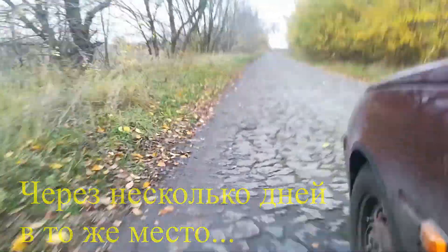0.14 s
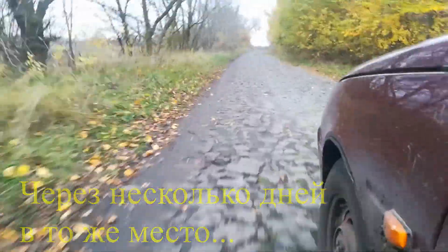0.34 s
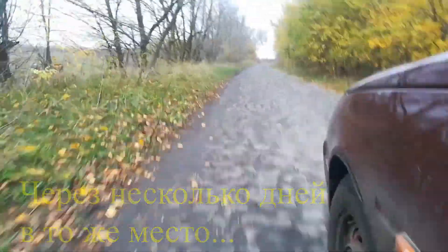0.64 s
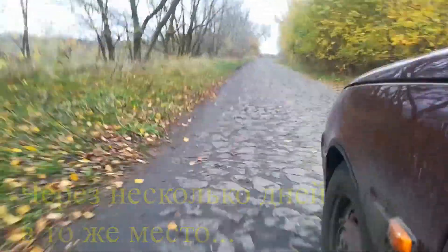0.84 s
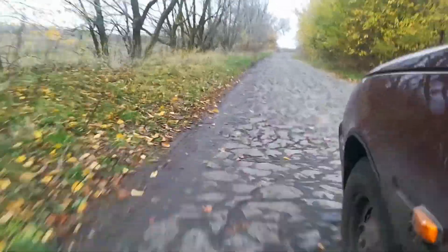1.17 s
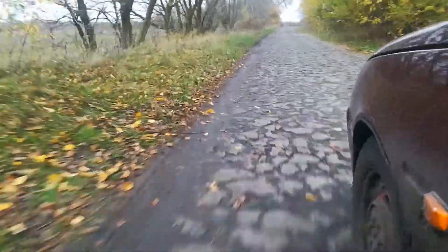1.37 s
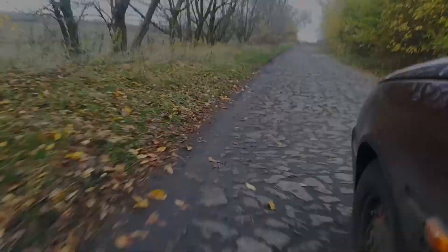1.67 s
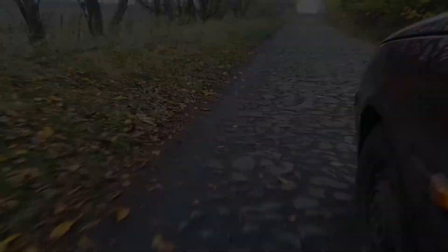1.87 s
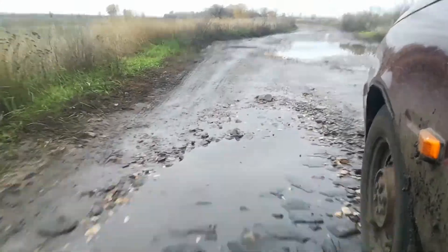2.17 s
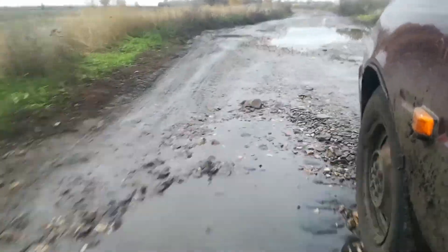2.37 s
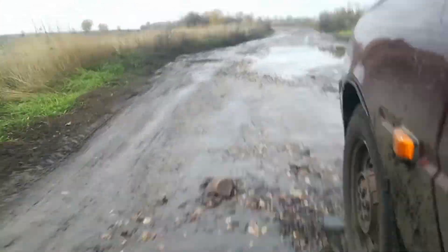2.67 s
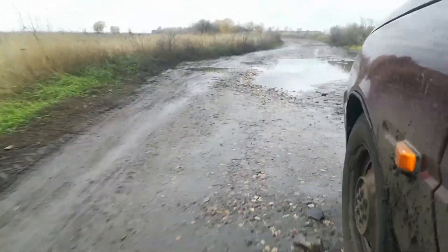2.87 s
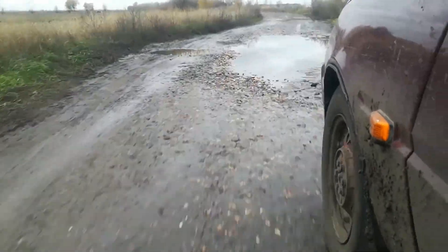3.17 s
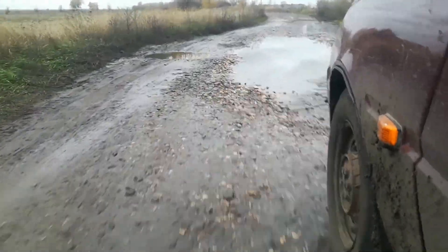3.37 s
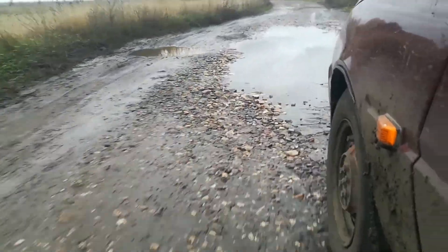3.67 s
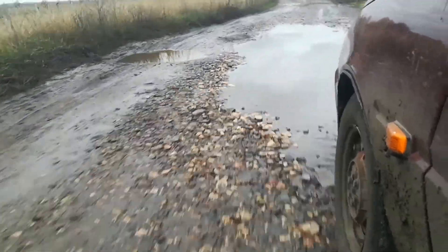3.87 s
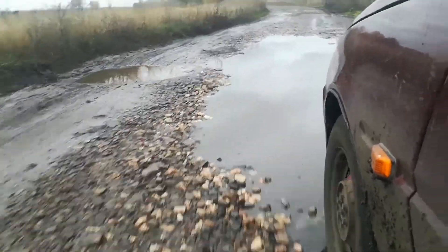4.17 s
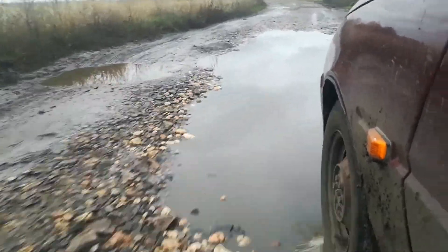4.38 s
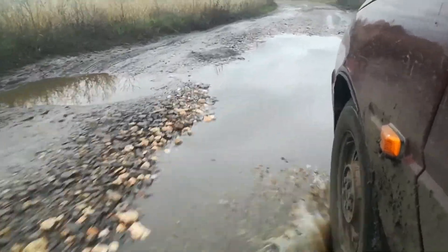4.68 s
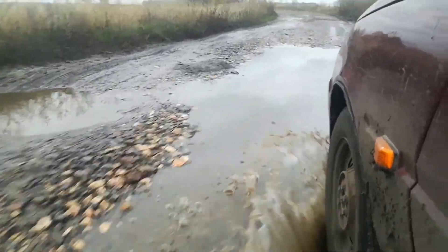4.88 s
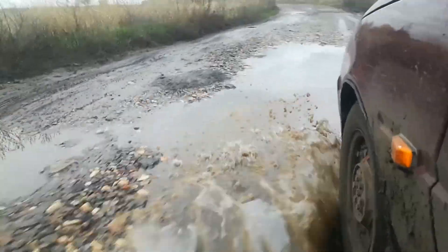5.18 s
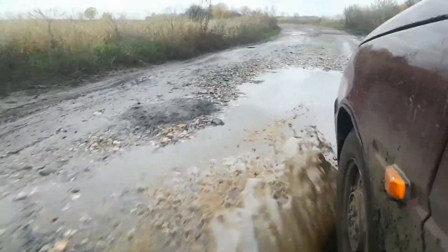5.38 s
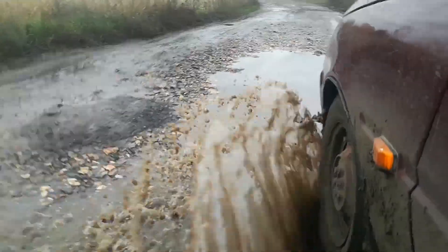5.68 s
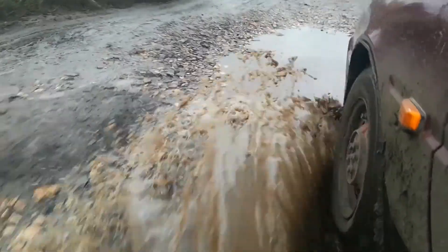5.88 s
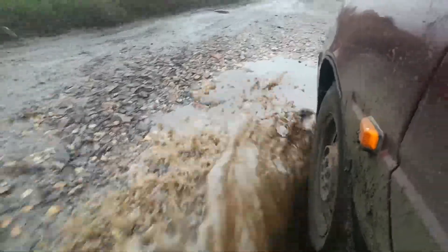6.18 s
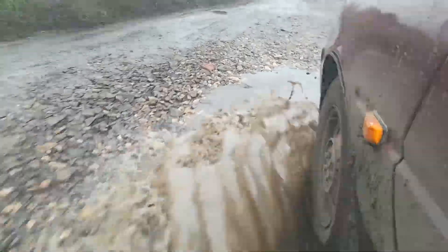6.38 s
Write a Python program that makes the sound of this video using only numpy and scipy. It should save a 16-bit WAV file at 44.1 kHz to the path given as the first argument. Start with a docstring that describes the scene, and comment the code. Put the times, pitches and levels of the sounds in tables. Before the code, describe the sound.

Close to the front wheel of a moving car, the tyre booms and patters over cobbles, with sharp stone knocks, a steady engine drone and gusts on the microphone. The surface changes to wet dirt: the engine clatters and slows a little as grit hisses and pebbles pop from the tread. Finally the wheel ploughs through a long puddle, throwing rushing, bubbling water against the body, and a surge slaps the wheel arch.

```python
"""A four-cylinder engine drones while a tyre rumbles and knocks over cobbles, heard through a microphone held
out of the car window behind the front wheel. Wind buffets the microphone, and metal squeaks once. At 2 s the
scene changes to a wet dirt road, where grit crackles and pebbles snap from under the tyre. Then the car drives
into a long muddy puddle: water gurgles, sprays and slops in the wheel arch, and a last surge ends in one hard
slap."""
import sys
import numpy as np
from scipy import signal
from scipy.io import wavfile
from scipy.ndimage import uniform_filter1d, minimum_filter1d

SR = 44100
rng = np.random.default_rng(int(sys.argv[2]) if len(sys.argv) > 2 else 0)


def log_audio(samples):
    """Write samples as a 16-bit WAV file to the path given in sys.argv[1]."""
    # one column per channel
    frames = np.atleast_2d(samples).T
    # limit to full scale, then quantise
    limited = np.clip(frames, -1, 1)
    pcm = np.round(limited * 32767).astype(np.int16)
    wavfile.write(sys.argv[1], SR, pcm)


N = 287973

# Table levels are starting values; the functions add their own gains.
# engine speed after the lane, slowing and then pulling into the puddle: t/s, crank turns per second
CRANK_SPEED = [(2.15, 44.8), (2.55, 41.0), (3.02, 33.8), (3.54, 33.8), (4.5, 38.3), (4.81, 38.3),
               (5.39, 33.5), (6.36, 33.4), (6.53, 36.0)]
# the tones of the engine: cycles per crank turn, level/dB
ENGINE_TONES = [(2, -24.5), (3, -27), (3.5, -32.5), (4, -31.5), (5, -31), (6, -37)]
# how hard the engine works: t/s, level/dB
ENGINE_LOAD = [(0, 0), (2.05, -1.5), (2.22, 1), (2.75, -1.5), (4.2, -.3), (4.55, 1.5), (5.0, -.8),
               (5.35, -.3), (5.7, -2.5)]
# the exhaust booms at two pitches and muffles what lies above: f/Hz, level/dB
EXHAUST_RESPONSE = [(66, -2), (76, 5), (87, 3), (100, -0.5), (122, 0), (134, 1.5), (146, -14), (240, -18.5)]
# how much the road shakes the car body: t/s, level/dB
BODY_SHAKE = [(0.0, -23.5), (0.16, -18), (1.71, -20.5), (1.93, -15.5), (2.18, -23.5), (2.5, -29.5),
              (4.07, -38), (4.25, -29), (4.8, -29), (6.53, -27.5)]
# the wheel drops into hollows between the cobbles: t/s, level/dB
HOLLOWS = [(1.17, -24), (1.31, -18.5), (1.8, -24), (1.961, -31)]
# the loudest stones knock in the wheel arch: t/s, level/dB, f/Hz
STONE_KNOCKS = [(0.053, -17.5, 1250), (0.304, -19, 1130), (0.456, -22.5, 1210), (0.513, -20, 1170),
                (0.656, -19.5, 1250), (1.104, -24, 990), (1.233, -26, 1040), (1.372, -20.5, 1110),
                (1.426, -25, 1130), (1.581, -19, 1080), (1.612, -17, 1090), (1.704, -18, 1040),
                (1.782, -18, 1170), (1.808, -22.5, 1190), (1.932, -19.5, 1200), (2.262, -26, 1050),
                (2.563, -25, 1130), (2.948, -21.5, 1070), (3.07, -27.5, 1290), (3.2, -26.5, 1240),
                (3.873, -22, 1420), (4.019, -26, 1100)]
# gusts on the microphone: t/s, length/s, level/dB
WIND_GUSTS = [(2.063, 0.063, -32), (2.653, 0.03, -31.5), (2.724, 0.03, -23.5), (3.0, .08, -34),
              (3.11, .08, -28.5), (3.285, 0.04, -26), (4.009, .12, -34.5), (4.92, 0.054, -35),
              (5.228, 0.078, -34.5), (5.464, 0.035, -33.5), (6.377, .12, -26)]
# the pitches of a thin metal squeak: f/Hz, level/dB
SQUEAK_TONES = [(3610, -54), (4270, -48)]
# pebbles snap from under the tread: t/s, level/dB, f/Hz
PEBBLE_SNAPS = [(1.2463, -33, 2960), (1.7823, -28, 2670), (1.858, -33.5, 3160), (1.922, -24.5, 3500),
                (2.0068, -31, 3060), (2.9477, -28, 2970), (3.8643, -31, 2800), (3.9135, -28, 3270),
                (4.0228, -26.5, 3220), (4.0703, -31, 2960), (4.2168, -25.5, 4160), (4.4345, -28, 3800),
                (4.5126, -24.5, 3600)]
# the tyre crunches through gravel: t/s, length/s, level/dB
GRAVEL_PATCHES = [(3.837, 0.052, -43.5), (3.99, 0.065, -43.5)]
# water under the wheel: t/s, depth (1 is about full)
WATER_DEPTH = [(4.24, 0.16), (4.55, 0.42), (4.85, 0.76), (5.1, 1.12), (5.6, 0.98), (6.53, 0.98)]
# thrown water splats on the panel over the wheel: t/s, level/dB, f/Hz
WATER_SPLATS = [(4.4902, -14.5, 2090), (4.604, -19, 1950), (4.6422, -17, 1700), (4.7098, -19, 2140),
                (4.7436, -14, 1930), (4.803, -16, 1900), (4.8678, -10.5, 2300), (4.9072, -18.5, 2010),
                (5.1947, -17.5, 2100)]
# lumps of water slop against the body: t/s, level/dB, f/Hz, cycles of ringing
WATER_SLOPS = [(4.642, -19, 934, 13), (4.684, -22, 1000, 16), (4.708, -17.5, 1020, 12),
               (4.722, -20.5, 960, 13), (4.7445, -8.5, 1270, 11), (4.813, -18, 1010, 13),
               (4.998, -19, 1000, 11), (5.153, -19.5, 1150, 12), (5.197, -17, 1210, 12),
               (5.299, -13.5, 920, 11), (5.391, -20, 1060, 8.5), (5.482, -17.5, 345, 8.9),
               (5.895, -9.5, 800, 17)]
# the pitches at which the wheel arch rings: f/Hz, level/dB
ARCH_TONES = [(440, -6.5), (710, -3), (850, 2.5), (1130, -0.5)]

# A spectrum says how strong a sound is from low to high pitch. Each one lists: f/Hz, level/dB
RUMBLE_SPECTRUM = [(18, -12), (34, -0.5), (50, -3.5), (66, 2), (125, -6.5), (170, -12), (300, -19),
                   (600, -33)]  # booming tyre and body
COBBLE_SPECTRUM = [(300, 6.5), (600, 0), (1150, 2.5), (1600, -8), (4300, -30), (7000, -32), (10500, -44),
                   (15500, -53.5)]  # tread on stone
WIND_SPECTRUM = [(30, -12.5), (100, 0), (220, 4.5), (350, -5), (500, -15), (750, -39), (1500, -58)]  # air on the microphone
CLATTER_SPECTRUM = [(300, -10), (700, -0.5), (1200, 10.5), (1550, -5), (1950, -11), (6000, -39)]  # engine clatter
GRIT_SPECTRUM = [(1500, 3.5), (3000, -3), (4900, -5), (6900, -10.5), (10500, -22.5), (15500, -34)]  # tread on wet grit
GURGLE_SPECTRUM = [(700, -3), (900, -4), (1300, 3)]  # the wave ahead of the tyre
WASH_SPECTRUM = [(300, 1), (580, -4.5), (850, 2.5), (1200, 4.5), (1500, -3), (1900, 2), (3800, -4.5),
                 (9000, -23)]  # rushing water
SPRAY_SPECTRUM = [(2500, -4), (4800, -7), (8000, -13), (10500, -21.5), (15500, -24.5)]  # fine drops

# how alike the microphone's two sides sound: f/Hz, likeness (1 or more counts as fully alike)
STEREO_LIKENESS = [(55, 0.995), (130, 1.3), (250, 1.3), (550, 0.23), (1100, 1), (1900, 1), (5000, 0.17)]
# how much louder the left side is than the right: f/Hz, level/dB
LEFT_OVER_RIGHT = [(150, -1), (600, 2), (1300, 3.5), (2400, 5.5), (4400, 8.5), (8100, 4), (15000, -0.5)]

LANE_END_S, LANE_FADE_S, LANE_TURNS_PER_S = 2.0, 0.1567, 34
CUTOFF_HZ = 15750
TIME_S = np.arange(N) / SR


def from_db(db):
    """Turn decibels into a number to multiply by."""
    return 10 ** (np.asarray(db) / 20)


def rms_one(x):
    """Scale a signal to an average power of 1."""
    return x / np.sqrt(np.mean(x ** 2) + 1e-20)


def pan(db):
    """Left and right gains that make the left louder by db."""
    return from_db(db * np.array([[.5], [-.5]]))


def in_time(points):
    """Read a time table at every sample."""
    return np.interp(TIME_S, *np.transpose(points))


def at_hz(points, hz):
    """Read a frequency table at one pitch, with octaves evenly spaced."""
    pitches, values = np.transpose(points)
    return np.interp(np.log(hz), np.log(pitches), values)


def swell(start_s, length_s, attack_s, release_s):
    """Rise to 1 at start_s, hold, then fade; the attack and release times each cover 20 dB."""
    t = TIME_S - start_s
    return 10 ** -np.clip(np.maximum(-t / attack_s, (t - length_s) / release_s), 0, 10)


def drift(rate_hz):
    """A smooth random wobble of typical size 1."""
    step = 40  # samples between random values
    r = np.exp(-2 * np.pi * step * rate_hz / SR)
    slow = signal.lfilter([1], [1, -2 * r, r * r], rng.standard_normal(N // step + 2002))[2000:]
    return np.interp(np.arange(N) / step, np.arange(len(slow)), rms_one(slow))


def ring(clicks, hz, cycles):
    """Each click is softened and rings a tone that fades by 60 dB in that many cycles."""
    decay = np.exp(-np.log(1000) * hz / (cycles * SR))
    soften = signal.butter(2, [hz / 2, min(hz * 2, CUTOFF_HZ)], "band", fs=SR, output="sos")
    resonator = [1, 0, -1, 1, -2 * decay * np.cos(2 * np.pi * hz / SR), decay * decay]
    return signal.sosfilt(np.vstack([soften, resonator]), clicks + 1e-18)


def place(pair, hz, alike=None):
    """Mix two unrelated signals into left and right; the car body shades the right side."""
    alike = np.clip(at_hz(STEREO_LIKENESS, hz) if alike is None else alike, -1, 1)
    both = np.sqrt(1 + alike) * pair[0] + np.sqrt(1 - alike) * pair[1] * [[1], [-1]]
    return both * pan(at_hz(LEFT_OVER_RIGHT, hz))


def noise(spectrum, flicker_db, rate_hz, alike=None):
    """Stereo noise in bands about a third of an octave wide, each flickering on its own."""
    low, high = spectrum[0][0], min(spectrum[-1][0], CUTOFF_HZ)
    edges = np.geomspace(low, high, int(np.log2(high / low) * 3) + 2)
    out, white = 0, rng.standard_normal((2, 2, N))
    for k, band in enumerate(zip(edges, edges[1:])):
        hz = np.sqrt(band[0] * band[1])
        pair = signal.sosfilt(signal.butter(2, band, "band", fs=SR, output="sos"), white[k % 2])
        gain = from_db(at_hz(spectrum, hz) + flicker_db * drift(rate_hz))
        out = out + gain * place(pair, hz, alike)
    return rms_one(out)


def grains(spectrum, low_hz, per_s, spread_db, cycles, share, pitches=18):
    """Tiny hits at random times; each rings a share of the pitches from low_hz up."""
    hits = np.flatnonzero(rng.random(N) < per_s / SR)
    sizes = from_db(spread_db * np.minimum(rng.exponential(1, N), 4))[hits]
    out = 0
    for hz in np.geomspace(low_hz, min(spectrum[-1][0], CUTOFF_HZ), pitches):
        clicks = np.zeros((2, N))
        clicks[:, hits] = sizes * rng.standard_normal((len(hits), 2)).T * (rng.random(len(hits)) < share)
        ringing = rms_one(ring(clicks, hz, cycles)) * np.sqrt(hz) * from_db(at_hz(spectrum, hz))
        out = out + place(ringing, hz)
    return rms_one(out)


def blows(rows, scatter, scatter_s, pan_db, cycles=None):
    """Each blow is a short fading tone, then a scatter of smaller ones; a row may set its own cycles."""
    out, t = np.zeros((2, N + SR)), np.arange(SR // 10) / SR
    for s, db, hz, *own_cycles in rows:
        push = scatter * rng.standard_normal((2, len(t))) * np.sqrt(hz / SR) * np.exp(-t / scatter_s)
        push[:, 0] += 1  # the main hit
        hit = ring(push, hz, own_cycles[0] if own_cycles else cycles)
        start = round(s * SR)
        out[:, start:start + len(t)] += from_db(db) * hit / np.abs(hit.mean(axis=0)).max()
    return out[:, :N] * pan(pan_db)


def engine(turns_per_s, crank_angle):
    """Two firings a turn make the drone; uneven cylinders add tones, and the body shakes once a turn."""
    shake_db = in_time(BODY_SHAKE) - 4 + 2 * drift(9.3)
    out = from_db(shake_db) * np.sin(crank_angle + 0.63 * drift(2.4))
    load_db = in_time(ENGINE_LOAD)
    for per_turn, db in ENGINE_TONES:
        level_db = db + load_db + at_hz(EXHAUST_RESPONSE, per_turn * turns_per_s) + .6 * drift(12)
        phase = per_turn * (crank_angle + .03 * drift(16)) + rng.uniform(0, 2 * np.pi)
        out += from_db(level_db) * np.sin(phase)
    return np.sqrt(2) * out


def tyre_rumble():
    """The tyre and the body boom as the wheel rides over bumps."""
    rolling = from_db(-14.5 + 0.47 * in_time(BODY_SHAKE))
    bumps = sum(from_db(db) * swell(s, 0, attack_s=0.062, release_s=.12) for s, db in HOLLOWS)
    return (rolling + bumps) * noise(RUMBLE_SPECTRUM, flicker_db=1.24, rate_hz=7.9)


def cobbles(crank_angle):
    """The tread hisses and patters on the stones; loose parts chatter as the engine shakes them."""
    shake = from_db(4.7 * np.cos(crank_angle))
    hiss = from_db(-.3) * shake ** .35 * noise(COBBLE_SPECTRUM, flicker_db=2.5, rate_hz=23.5)
    patter = grains(COBBLE_SPECTRUM[:-3], low_hz=950, per_s=130, spread_db=-2.5, cycles=10, share=.8)
    return from_db(-36.5) * (hiss + from_db(-6) * shake * patter)


def stone_knocks():
    """Stones knock in the wheel arch, each with a weaker, higher tick."""
    knocks = blows(STONE_KNOCKS, cycles=9, scatter=.4, scatter_s=.004, pan_db=2.5)
    tick_rows = [(s, db - 9, 1.65 * hz) for s, db, hz in STONE_KNOCKS]
    ticks = blows(tick_rows, cycles=7, scatter=.4, scatter_s=.003, pan_db=3)
    return from_db(1.2) * (knocks + ticks)


def wind():
    """Swirls of air buffet each side of the microphone in quick lumps; the breeze slowly eases."""
    breeze = from_db(-36 - 2.1 * TIME_S)
    gusts = sum(from_db(db) * swell(s, length, attack_s=0.05, release_s=0.062)
                for s, length, db in WIND_GUSTS)
    lumps = from_db(5.45 * np.tanh([drift(26), drift(19.5)]))
    air = noise(WIND_SPECTRUM, flicker_db=2.5, rate_hz=22.7, alike=0.21)
    return from_db(5) * np.hypot(breeze, gusts) * lumps * air


def squeak():
    """Metal scrapes once near the wheel, faint and rough."""
    ringing = sum(from_db(db) * rms_one(ring(rng.standard_normal((2, N)), hz, cycles=42))
                  for hz, db in SQUEAK_TONES)
    roughness = from_db(3 * drift(90))
    return swell(0.35, 0.073, attack_s=0.013, release_s=0.021) * roughness * ringing


def pebbles():
    """Pebbles snap from under the tread, with bright cracks that grow stronger as the puddle nears."""
    snaps = blows(PEBBLE_SNAPS, cycles=16, scatter=0.4, scatter_s=0.003, pan_db=7)
    crack_rows = [(s, db - 6.5, 7000) for s, db, _ in PEBBLE_SNAPS]
    cracks = blows(crack_rows, cycles=3, scatter=.2, scatter_s=.004, pan_db=4)
    crack_gain = swell(4.5, 0, attack_s=2.38, release_s=N / SR)
    return from_db(3.5) * (snaps + crack_gain * cracks)


def engine_clatter(turns_per_s, crank_angle):
    """The clatter pulses with each firing and grows louder as the engine turns faster."""
    level_db = -47 + 8 * np.log2(turns_per_s / LANE_TURNS_PER_S)
    firing_db = 3.1 * np.cos(2 * crank_angle)
    return from_db(level_db + firing_db) * noise(CLATTER_SPECTRUM, flicker_db=4.0, rate_hz=20)


def wet_grit():
    """Grit hisses and crackles under the tread, louder on gravel and towards the water's edge."""
    wet = from_db(-46.5) * swell(4.5, 0, attack_s=2.38, release_s=0.37)
    gravel = sum(from_db(db) * swell(s, length, attack_s=0.069, release_s=0.12)
                 for s, length, db in GRAVEL_PATCHES)
    hiss = noise(GRIT_SPECTRUM, flicker_db=3.5, rate_hz=29)
    crackle = grains(GRIT_SPECTRUM, low_hz=1800, per_s=300, spread_db=3.2, cycles=12, share=.6)
    grit = np.hypot(wet, gravel) * (from_db(3) * hiss + from_db(-1) * crackle)
    # a short, dull echo off the car's side boosts some pitches and weakens others
    echo_s = .00051
    echo = np.roll(uniform_filter1d(grit, size=3), round(echo_s * SR), axis=1)
    return grit - .65 * echo


def puddle():
    """The wheel throws up bubbly water and fine spray, pushes a gurgling wave, and slops the body."""
    depth = in_time(WATER_DEPTH)
    rush = noise(WASH_SPECTRUM, flicker_db=3.0, rate_hz=21)
    bubbles = grains(WASH_SPECTRUM, low_hz=814, per_s=1600, spread_db=3, cycles=37, share=.1)
    wash = from_db(-34.5) * depth * (from_db(5) * rush + from_db(1) * bubbles)
    mist = noise(SPRAY_SPECTRUM, flicker_db=1.7, rate_hz=30)
    drops = grains(SPRAY_SPECTRUM, low_hz=3020, per_s=450, spread_db=2.5, cycles=12, share=.3, pitches=10)
    # spray grows with depth much faster than the wash does
    spray = from_db(-41) * depth ** 2.7 * (from_db(6) * mist + from_db(-1) * drops)
    wave = from_db(-42) * swell(4.3, N / SR, attack_s=0.52, release_s=0.52)
    gurgle = grains(GURGLE_SPECTRUM, low_hz=710, per_s=500, spread_db=3.5, cycles=30, share=.22, pitches=8)
    slops = from_db(2) * blows(WATER_SLOPS, scatter=0.67, scatter_s=0.0081, pan_db=2)
    splats = from_db(-1) * blows(WATER_SPLATS, cycles=4.5, scatter=.9, scatter_s=.005, pan_db=5.5)
    flutter = from_db(0.9 * drift(42))
    return flutter * (wash + spray) + wave * gurgle + slops + splats


def water_slap():
    """A surge of water drums on the wheel arch, then one hard slap rings all its tones at once."""
    drumming = sum(from_db(db) * rms_one(ring(rng.standard_normal(N), hz, cycles=16))
                   for hz, db in ARCH_TONES[2:])
    surge = from_db(-21) * swell(6.215, 0.037, attack_s=0.007, release_s=0.037) * rms_one(drumming)
    slap_rows = [(6.247, db - 6.5, hz) for hz, db in ARCH_TONES]
    slap = blows(slap_rows, cycles=14, scatter=.2, scatter_s=.006, pan_db=0)
    muffle = signal.butter(6, 1240, fs=SR, output="sos")  # the arch passes little above its tones
    return signal.sosfilt(muffle, surge + slap) * pan(3.5)


def scene():
    """Car, road and water reach the left side just after the right; wind hits the microphone itself."""
    on_lane = swell(0, LANE_END_S, LANE_FADE_S, LANE_FADE_S)
    turns_per_s = np.where(TIME_S < LANE_END_S + LANE_FADE_S / 2, LANE_TURNS_PER_S, in_time(CRANK_SPEED))
    crank_angle = 2 * np.pi * np.cumsum(turns_per_s) / SR
    car = engine(turns_per_s, crank_angle) + tyre_rumble()
    car += on_lane * cobbles(crank_angle) + stone_knocks() + squeak()
    dirt_road = (1 - on_lane) * (engine_clatter(turns_per_s, crank_angle) + wet_grit())
    left, right = car + dirt_road + pebbles() + puddle() + water_slap()
    lag_s = .00009
    late_left = np.pad(left, (round(lag_s * SR), 0))[:N]
    faint_hiss = from_db(-66) * rng.standard_normal((2, N))
    return np.array([late_left, right]) + wind() + faint_hiss


def record(dry):
    """A limiter turns everything down at a loud peak and steadily back up; the highest treble is cut."""
    ceiling_db, attack_s, recovery_db_per_s = -1.3, 0.0039, 46
    peak_db = 20 * np.log10(np.abs(dry).max(axis=0) + 1e-9)
    over_db = np.maximum(peak_db - ceiling_db, 0)
    recovery_db = recovery_db_per_s * TIME_S
    cut_db = np.maximum.accumulate(over_db + recovery_db) - recovery_db
    span = round(attack_s * SR)
    smooth_gain_db = uniform_filter1d(minimum_filter1d(-cut_db, span), span)
    treble_cut = signal.ellip(12, .1, 90, CUTOFF_HZ, fs=SR, output="sos")
    return signal.sosfilt(treble_cut, dry * from_db(smooth_gain_db))


dry = scene()
out = record(dry)
log_audio(out)
```